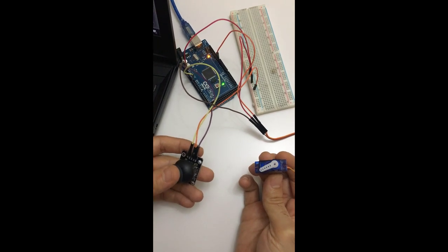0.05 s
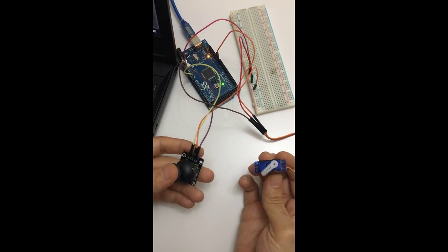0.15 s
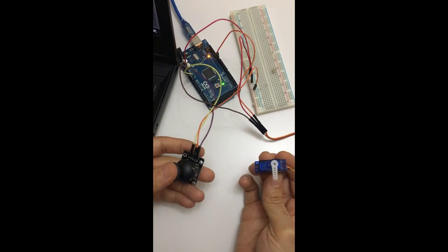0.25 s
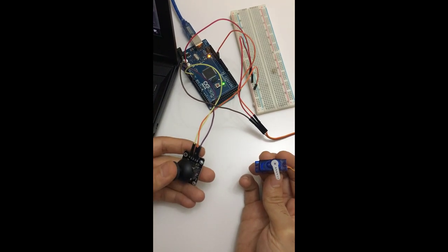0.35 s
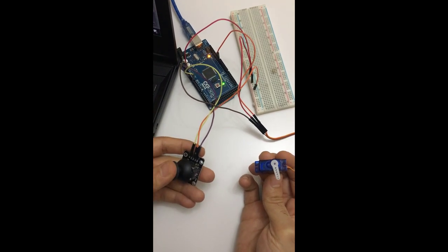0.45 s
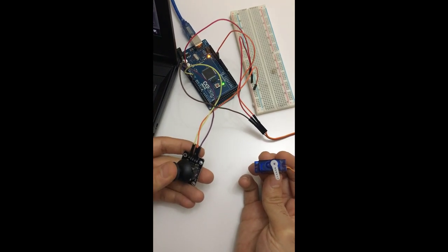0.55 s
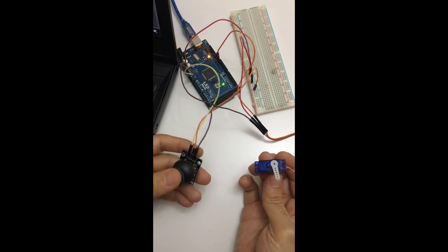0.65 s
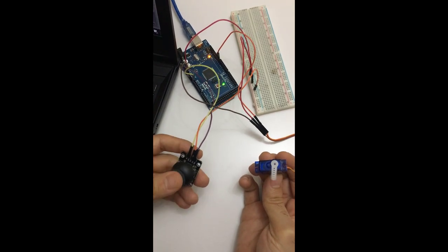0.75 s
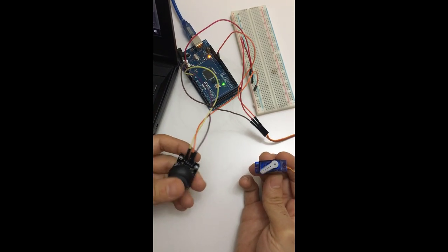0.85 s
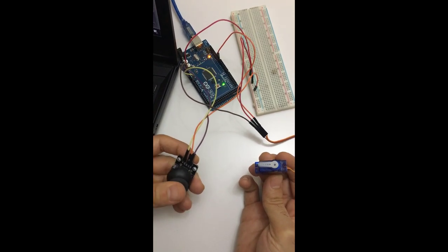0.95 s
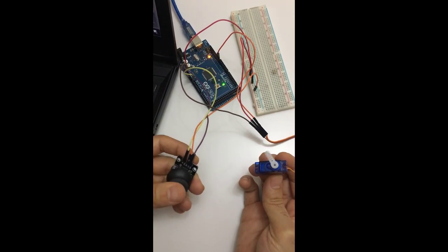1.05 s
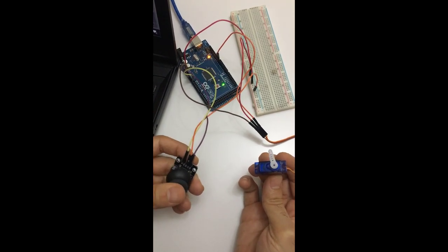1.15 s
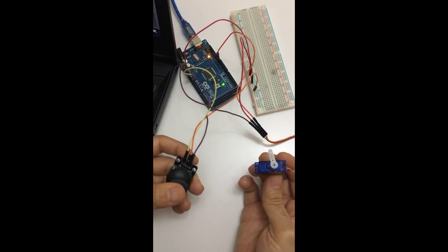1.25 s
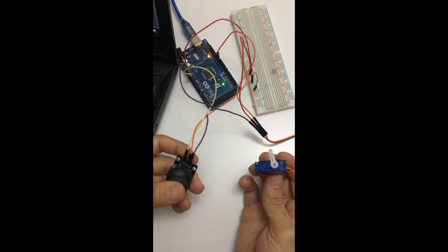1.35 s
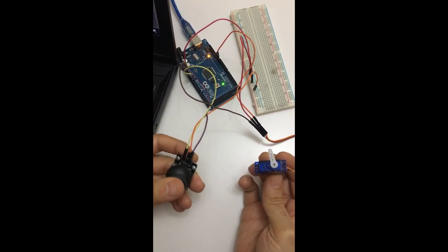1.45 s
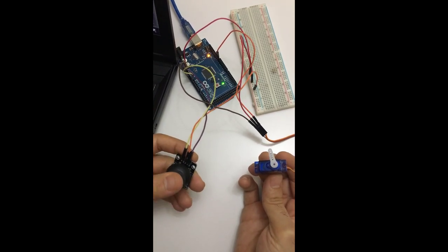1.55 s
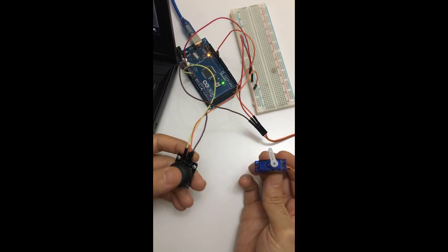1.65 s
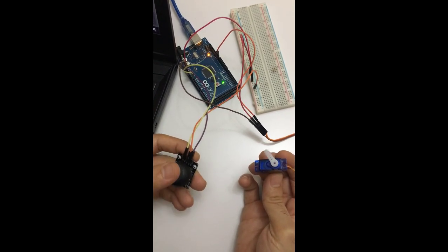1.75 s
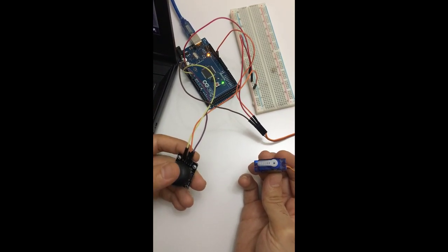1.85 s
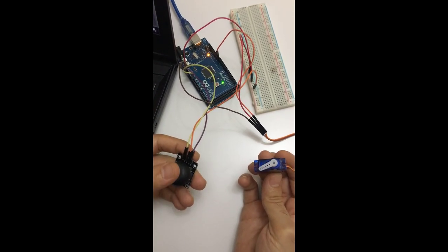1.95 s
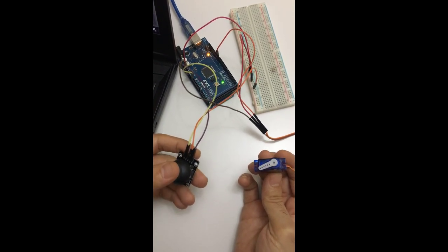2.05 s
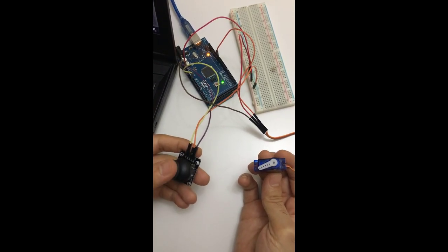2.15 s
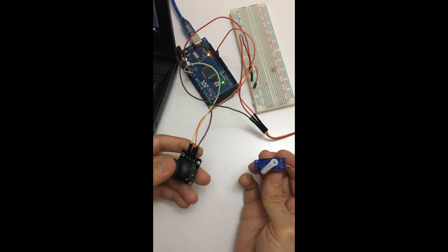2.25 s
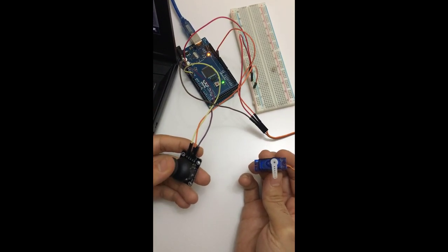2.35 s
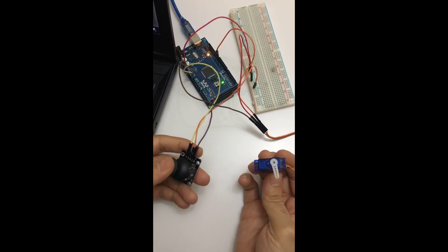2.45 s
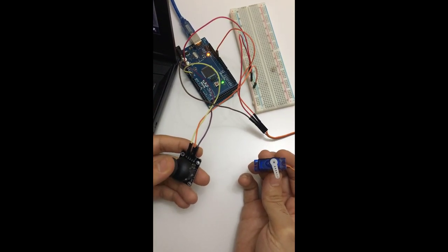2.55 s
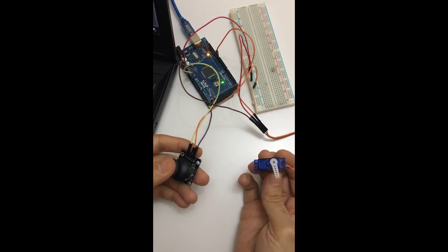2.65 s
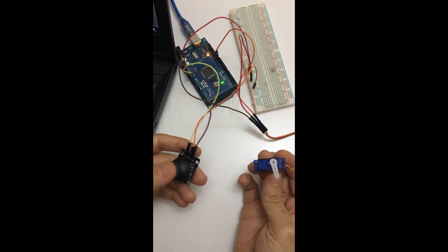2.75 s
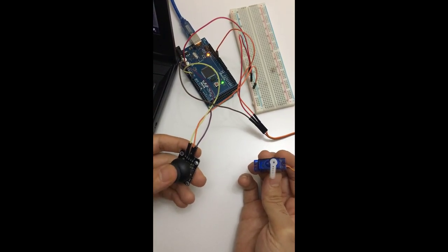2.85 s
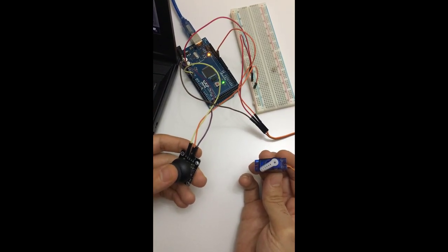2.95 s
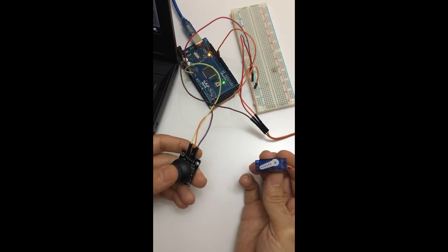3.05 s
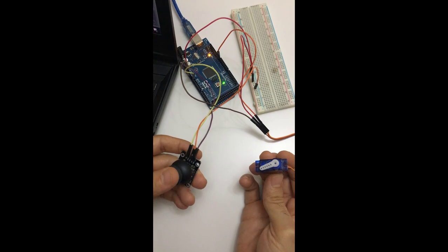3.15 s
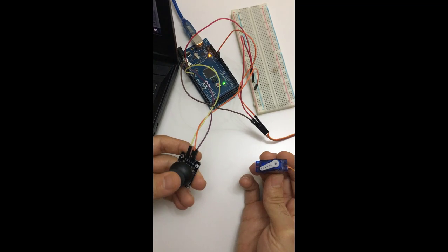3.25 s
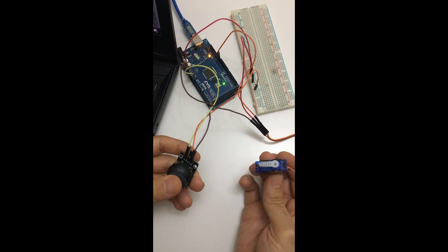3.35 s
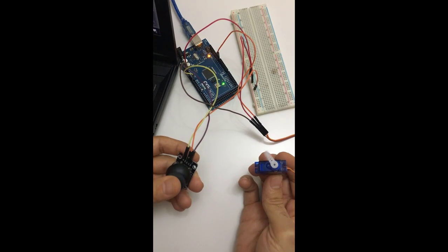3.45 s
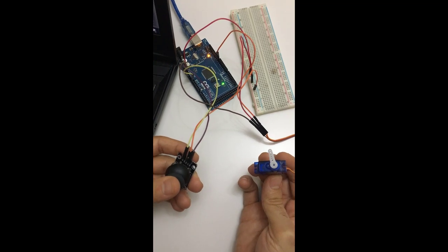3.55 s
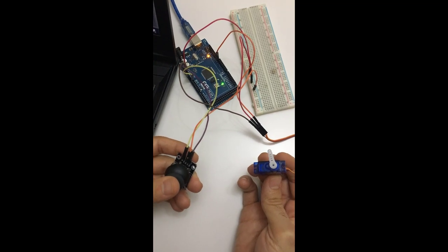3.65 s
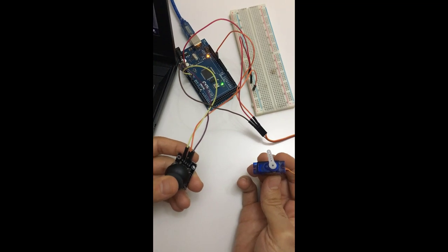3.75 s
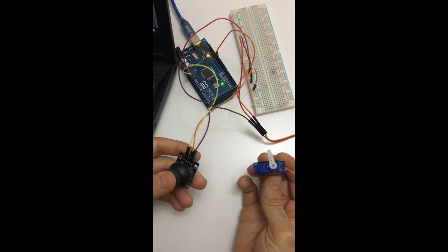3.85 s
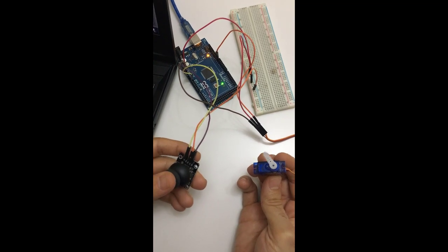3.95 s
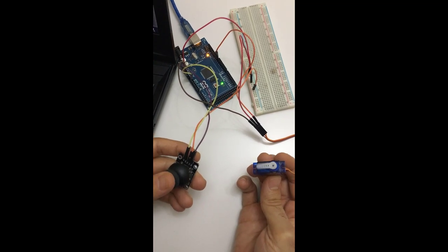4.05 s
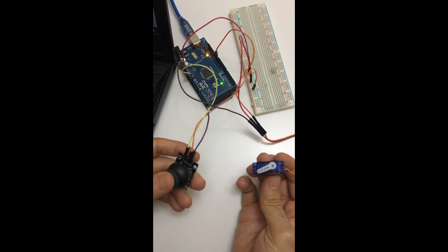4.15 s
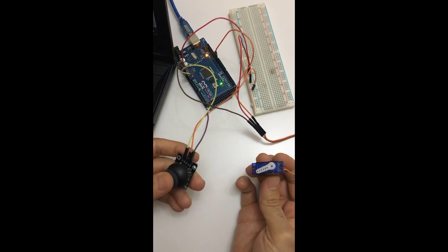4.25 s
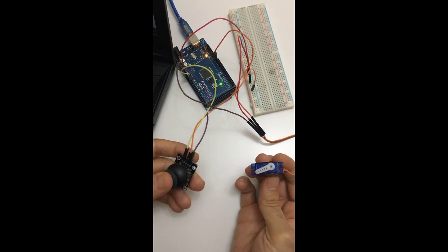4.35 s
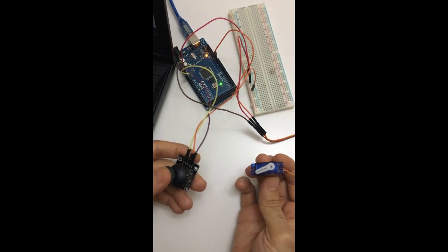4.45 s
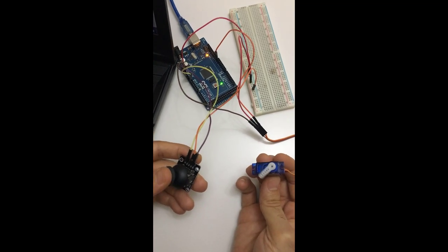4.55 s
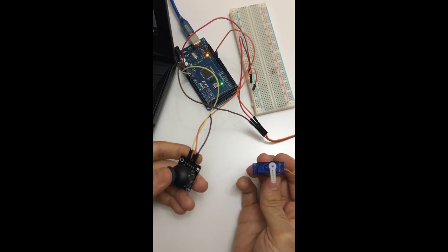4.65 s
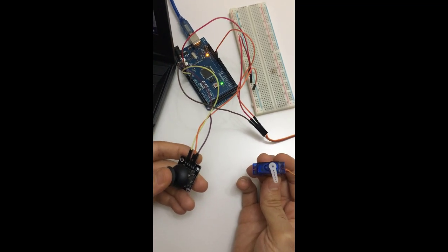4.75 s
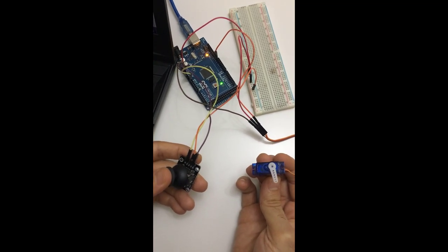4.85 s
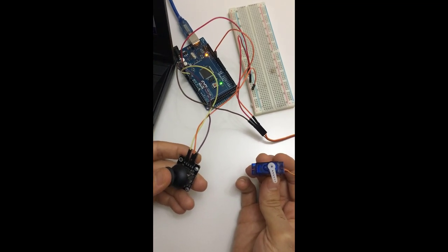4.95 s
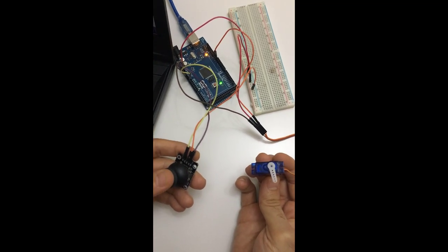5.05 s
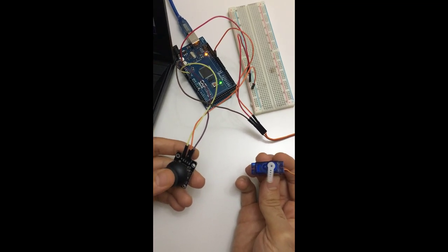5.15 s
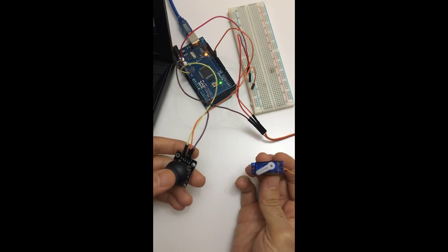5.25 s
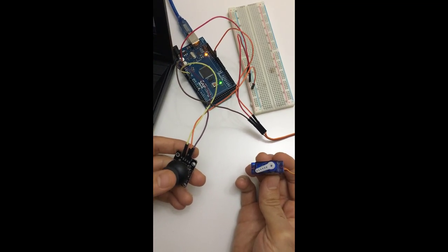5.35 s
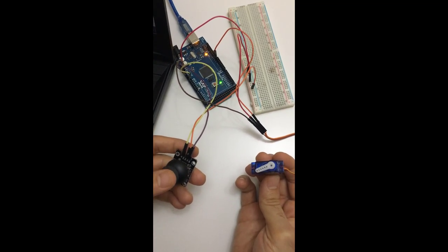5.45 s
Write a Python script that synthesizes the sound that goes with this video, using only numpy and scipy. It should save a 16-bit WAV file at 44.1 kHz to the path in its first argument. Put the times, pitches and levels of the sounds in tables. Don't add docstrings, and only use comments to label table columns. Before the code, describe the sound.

Tiny servo swings back and forth in brief dry buzzing whirrs, gears rattling, with a few thumb-stick clicks over soft room hiss.

```python
import sys
import numpy as np
from scipy import signal
from scipy.io import wavfile
from scipy.ndimage import uniform_filter1d

SR = 44100
rng = np.random.default_rng(int(sys.argv[2]) if len(sys.argv) > 2 else 0)


def boost(x):
    u = np.asarray(x, float) / 20
    return 10 ** u


def generate_wav(sig):
    pcm = np.round(np.clip(np.atleast_2d(sig).T, -1, 1) * 32767).astype(np.int16)
    wavfile.write(sys.argv[1], SR, pcm)


N = 242991
TIME = np.arange(N) / SR

# frequency in Hz, level in dB per Hz.
AIR = [(18, -52), (32, -28), (48, -9), (102, -4.5), (125, -14.5), (158, -9), (296, -16), (500, -21),
       (720, -24), (1730, -28.5), (4000, -32), (14600, -37), (15500, -53), (16300, -56)]
AIR_DB = -67
# frequency in Hz, width in Hz, level in dB, steady part as amplitude.
HUM = [
    (55.4, 12, -77, 0.0039),
    (98.8, 14.3, -73, 0.071),
    (151, 14, -85.5, .01),
    (300.7, 9.1, -83, 0.012),
]
# time in seconds, level of the bass in dB (-72 leaves it unchanged).
RUMBLE = [(0.0, -72), (0.71, -78), (1.04, -65), (1.63, -80.5), (1.96, -71.5), (4.11, -73.5), (5.16, -62.5),
          (5.39, -73), (5.51, -60)]
# centre in seconds, length in seconds, frequency in Hz, level in dB.
MOANS = [(2.5, .14, 205, -67), (4.97, .08, 215, -73), (5.25, .4, 116, -68), (2.15, .17, 250, -73),
         (1.82, .1, 245, -74), (5.3, .35, 235, -77)]

# power on in seconds, standstill aimed at in seconds,
# commutator whine in dB, once-a-turn throb from 0 to 1.
SWINGS = [(-.2, 0.122, -72, 0), (.2, 0.392, -74, 0.3), (0.807, 0.996, -67, 0.4), (0.998, 1.205, -67, 0.56),
          (1.803, 2.016, -70.5, 0.2), (2.307, 2.48, -72, 0.23), (2.897, 3.095, -66.5, 0.44),
          (3.4, 3.62, -65.5, 0.13), (4.004, 4.213, -70.5, 0.3), (4.608, 4.782, -71, 0.25),
          (5.199, 5.399, -66, 0.4)]
TOP_HZ, SPIN_UP_S, BRAKING_S = 442.9, .03, .08
PINION_DB = [-90, -74, -74, -74, -66, -61, -74, -72, -58, -70, -74]
# power on in seconds, braking in seconds, gears still in seconds,
# level at speed in dB, climb under load in dB.
WHIRRS = [(-.2, 0.066, 0.13, -46.5, -13), (0.205, 0.318, .41, -44.5, 2.5), (0.799, 0.957, 1.0, -43.5, 3),
          (1, 1.19, 1.215, -44.5, -2.5), (1.798, 1.961, 2.057, -45, 0), (2.301, 2.419, 2.514, -43.5, 3),
          (2.899, 3.036, 3.105, -42, 3.5), (3.399, 3.595, 3.625, -43, 0), (3.998, 4.167, 4.24, -44, 2),
          (4.6, 4.725, 4.803, -43.5, 2.5), (5.205, 5.341, 5.41, -41.5, 1)]
WAKE_S, WAKE_DB, STILL_DB = 0.044, -11.5, -26.5
TAKE_UP_S, TAKE_UP_DB = 0.005, -13

# frequency in Hz, level in dB per Hz.
CASE = [(880, -35), (1500, -23.5), (2580, -16.5), (4050, -7.5), (4900, -11.5), (6300, -9), (8600, -4),
        (15400, -12.5), (16000, -33), (16500, -55.5)]
# frequency in Hz, width in Hz, lift in dB.
PANELS = [(2360, 425, 7.5), (4300, 100, -1), (4785, 105, -24.5), (6330, 470, 8), (6980, 255, 7),
          (7960, 160, -7.5), (8400, 310, 5), (9160, 450, 4.5), (9770, 710, 6), (10340, 400, -1.5),
          (11990, 250, 7.5), (12740, 250, 4.5)]
THIN_DB = -6

# time in seconds, peak in
# dB, treble over middle in dB, ring of the output gear in dB.
JOLTS = [(0.011, -25, 13, -47), (.0163, -31, 7, -52), (1.1842, -29.5, 14, -48), (1.192, -62, 1.5, -47),
         (1.198, -46, -1, -53), (1.9484, -27, -10, -59), (2.4052, -26, -2, -62), (3.5886, -30, 0, -51),
         (3.591, -31, -1, -46), (3.5995, -30, 14, -49), (3.607, -31, 1, -59), (4.0978, -30, -10, -56),
         (1.053, -28.5, -6, -60), (2.3513, -28.5, 5, -49), (4.012, -36, -3, -48), (4.148, -36, 11, -60),
         (4.658, -26, 1, -63), (4.023, -28, 13.5, -60), (4.6785, -31, 1, -60), (4.6856, -28.5, -3, -65),
         (4.7085, -40, -1, -66), (2.3917, -34, 0, -62), (2.41, -26.5, 1, -66), (2.4248, -31, 0, -65),
         (0.3393, -33, -2, -62), (1.8434, -33, 6, -58), (.8648, -31, 8, -60)]
GEAR_HZ = 5320
# time in seconds, peak in dB, treble over middle in dB.
RATTLES = [(0.057, -27.5, 14), (0.2529, -30, 0), (0.3097, -33, 13), (0.3294, -28, 15), (0.0248, -34, 15),
           (0.8464, -32, 8), (1.193, -30.5, 17), (1.8173, -30, -12), (1.8519, -31, -13), (1.8865, -29.5, 1),
           (1.8912, -32, 8), (1.9171, -29.5, -7), (1.959, -27, -2), (1.9639, -31, 13), (2.3259, -34, 16),
           (2.3795, -23.5, 13), (2.4175, -27.5, 3), (3.0404, -34, 9), (3.0573, -33, 9.5),
           (4.0176, -33, -12), (4.0765, -26.5, 10), (4.0843, -32, 0), (4.1182, -29, -1), (4.1276, -24, 17),
           (4.1433, -30, -3), (4.1503, -26, 8), (4.1703, -30, -11), (4.6324, -29, 15), (4.7254, -36, 12),
           (4.7451, -30.5, 15)]
SLACK_PER_S = [8, 12, 4, 3, 12, 15, 5, 10, 8, 15, 6]
SLACK_DB, SLACK_SPREAD_DB, SLACK_TILT_DB = 10, 3, 1

# time in seconds, peak in dB, treble over middle in dB.
TICKS = [(0.1219, -53, 3), (0.2019, -57, -5), (0.4443, -56.5, -2), (0.5417, -57.5, 1), (1.3198, -61, -19),
         (1.3793, -57, -8), (1.4394, -67, -15), (1.4692, -37, 25), (1.4782, -62, 17), (1.4858, -57, -1),
         (1.5029, -61, -2), (1.801, -53, -5), (2.0409, -58, 8), (2.1412, -59, -19), (2.2057, -60.5, -4),
         (2.2203, -56.5, -11), (2.26, -54, 15.5), (2.5089, -57, -1), (2.5321, -58, 3), (2.5617, -52, 4),
         (2.6215, -61, -1), (3.1211, -57, -3), (3.779, -56, -7), (3.8615, -37, 16), (3.8705, -61, 7),
         (3.8978, -43.5, -11), (4.001, -60, 0), (4.3415, -52, -8), (4.8409, -55.5, -5), (5.2005, -54, 2)]
# first pulse in seconds, last pulse in seconds, level in dB.
HUNTS = [(.14, .18, -65), (.42, .44, -65), (.483, .483, -63), (.52, .52, -65), (1.28, 1.3, -62),
         (1.36, 1.36, -68), (1.42, 1.46, -63), (2.06, 2.12, -69), (2.3, 2.3, -63), (2.6, 2.6, -63),
         (3.14, 3.18, -66), (3.22, 3.26, -62), (3.68, 3.72, -61), (3.76, 3.76, -63), (3.82, 3.84, -60),
         (4.28, 4.32, -64), (4.8, 4.8, -56), (4.82, 4.82, -64), (4.88, 4.94, -63), (5.42, 5.46, -65),
         (5.5, 5.5, -61)]
HUNT_DB, HUNT_SPREAD_DB, HUNT_TILT_DB = 0.9, 1, -20
PULSE_S, SETTLE_S = .02, .23
SEAT_HZ, SEAT_DB, SEAT_LIFT_DB = 4180, -52, 7

# time in seconds, level in dB, low ring in Hz, high ring in Hz, high over low in dB.
SNAPS = [(0.2504, -37.5, 2380, 3500, -5), (0.9709, -36.5, 2180, 3900, 4), (1.469, -38.5, 5060, 7400, 6),
         (2.285, -57, 2670, 5290, 9.5), (3.8612, -36.5, 5150, 7540, 1.5), (3.8974, -40.5, 2040, 4940, 3),
         (4.576, -62.5, 2580, 7200, 15)]
# frequency in Hz, t60 in seconds.
WALLS = [(1000, 0.37), (4000, 0.27), (9000, 0.17), (15000, 0.19)]


def evened(x):
    return x / np.sqrt(np.mean(x ** 2) + 1e-20)


def read(points, hz):
    f, value = np.transpose(points)
    return np.interp(np.log(hz + 1), np.log(f + 1), value)


def resonate(x, hz, width):
    turn = np.exp(2j * np.pi * np.cumsum(hz * np.ones(len(x))) / SR)
    r = np.exp(-np.pi * width / SR)
    return 2 * (turn * signal.lfilter([(1 - r) ** 2], [1, -2 * r, r * r], x / turn)).real


def burst(times, dbs, decay_s):
    out, t = np.zeros(N + 400), np.arange(400) / SR
    shape = (1 - np.exp(-t / 0.000073)) * np.exp(-t / decay_s)
    for s, db, chatter in zip(times, dbs, rng.standard_normal((len(times), 400))):
        out[round(s * SR):][:400] += boost(db) * chatter * shape
    return out[:N]


def room_tone():
    frames, hz = N // 512 + 5, np.fft.rfftfreq(2048, 1 / SR)
    a, b = rng.standard_normal((frames, len(hz), 2)).T
    spectrum = (a + 1j * b) * boost(read(AIR, hz))[:, None]
    hiss = evened(signal.istft(spectrum, nperseg=2048, noverlap=1536)[1][:N])
    swell = boost(np.interp(TIME, *np.transpose(RUMBLE)) + 72.0)
    hum = np.zeros(N)
    for f, width, db, steady in HUM:
        source = rng.standard_normal(N) + steady * np.sin(2 * np.pi * f * TIME)
        line = boost(db) * evened(resonate(source, f, width))
        hum += line * (swell if f < 80 else 1)
    drones = np.zeros(N)
    for s, length, f, db in MOANS:
        drones += boost(db) * np.exp(-((TIME - s) / length * 2) ** 2) * np.sin(2 * np.pi * f * TIME)
    return boost(AIR_DB - 3.5) * hiss + hum + drones


def case(x, tilt_db=0, mount_db=0, low_db=0):
    hz = abs(np.fft.fftfreq(4096, 1 / SR))
    db = read(CASE, hz)
    db += sum(lift / (1 + (2 * (hz - f) / w) ** 2) for f, w, lift in PANELS)
    db += tilt_db * np.tanh((hz - 7500) / 1500) / 2
    db += mount_db / (1 + ((hz - 4170) / 300) ** 2)
    db += low_db / (1 + (hz / 5000) ** 8)
    log_gain = np.log(boost(np.maximum(db, -80)))
    taps = np.fft.ifft(np.exp(np.conj(signal.hilbert(log_gain)))).real[:1024]
    return signal.oaconvolve(x, taps / np.linalg.norm(taps))[:N]


def shaft():
    drive = sum((TIME > on) * np.clip((stop - TIME) / BRAKING_S, 0, 1) for on, stop, *_ in SWINGS)
    lag = np.exp(-1 / (SPIN_UP_S * SR))
    return TOP_HZ * signal.lfilter([1 - lag], [1, -lag], drive, zi=[lag])[0]


def whirr_db():
    out = np.full(N, -140.)
    for on, brake, still, db, climb_db in WHIRRS:
        inside = (TIME >= on) & (TIME < still)
        t = TIME[inside]
        shape = np.interp(t, [on, brake], [-climb_db, 0])
        shape += STILL_DB * np.clip((t - brake) / (still - brake), 0, 1) ** 1.2
        shape += WAKE_DB * np.exp(-(t - on) / WAKE_S)
        shape += TAKE_UP_DB * np.exp(-(t - on) / TAKE_UP_S)
        out[inside] = np.maximum(out[inside], db + shape)
    return out


def motor():
    speed = shaft()
    turns = np.cumsum(speed) / SR
    swing = np.searchsorted([row[0] for row in SWINGS], TIME) - 1
    whine_db, throb = np.array(SWINGS)[swing, 2:].T

    each_turn = boost(1.2 * rng.standard_normal(N)[turns.astype(int)])
    high_spot = np.exp(np.cos(2 * np.pi * turns)) / 1.27 * each_turn
    throb = np.clip(throb, 0, 1)
    wander = boost(1.47 * evened(uniform_filter1d(rng.standard_normal(N), 150)))
    rubbing = (1 - throb + throb * high_spot) * wander * rng.standard_normal(N)
    scrape = case(evened(rubbing) * boost(whirr_db()))
    body = signal.sosfilt(signal.butter(2, 3300, fs=SR, output='sos'), scrape)
    scrape -= body * np.clip(1 - (speed / 400) ** 2, 0, 1) * .9

    whine = boost(whine_db) * (speed / TOP_HZ) ** 5.3
    whine *= boost(1.2 * evened(uniform_filter1d(rng.standard_normal(N), 700)))
    bars = np.sin(6 * np.pi * turns) + boost(-12) * np.sin(12 * np.pi * turns)

    fuzz = evened(resonate(rng.standard_normal(N), 9 * speed, 40))
    pinion = (np.sin(18 * np.pi * turns) + .5 * fuzz) * boost(PINION_DB)[swing]
    pushing = np.clip(np.gradient(speed) * SR / 1500, 0, 1) * (speed / TOP_HZ) ** 2
    return scrape + whine * np.sqrt(2) * bars + pushing * pinion


def knocks(rows, decay_s, mount_db):
    dull, bright, t = np.zeros(N + 400), np.zeros(N + 400), np.arange(400) / SR
    shape = (1 - np.exp(-t / 0.00038)) * np.exp(-t / decay_s)
    for (s, db, tilt_db), chatter in zip(rows, rng.standard_normal((len(rows), 400))):
        share = np.clip(.5 + (tilt_db - 2.0) / 22, 0, 1)
        at = round(s * SR)
        blow = boost(db) * np.sqrt(np.mean(shape ** 2)) * evened(chatter * shape)
        dull[at:at + 400] += np.sqrt(1 - share) * blow
        bright[at:at + 400] += np.sqrt(share) * blow
    return case(dull, -8, mount_db, THIN_DB) + case(bright, 7, 0, THIN_DB)


def jolts():
    s, _, _, ring_db = np.transpose(JOLTS)
    ring = resonate(burst(s, ring_db + 20, 0.0014), GEAR_HZ, 750)
    return knocks([row[:3] for row in JOLTS], 0.001, 0) + ring


def slack():
    slot_s = .004
    slots = np.arange(0, TIME[-1] - .02, slot_s)
    swing = np.searchsorted([row[0] for row in WHIRRS], slots) - 1
    luck = rng.random(len(slots))
    size, colour = rng.standard_normal((2, len(slots)))
    db = np.interp(slots, TIME, whirr_db())
    hit = (luck < np.array(SLACK_PER_S)[swing] * slot_s) & (db > -70)
    return np.transpose([slots, db + SLACK_DB + SLACK_SPREAD_DB * size, SLACK_TILT_DB * colour])[hit]


def rattle():
    return boost(1.5) * knocks([*RATTLES, *slack()], 0.0013, 0)


def hunting():
    pulses = []
    for first, last, db in HUNTS:
        pulses += [(s, db) for s in np.arange(first, last + PULSE_S / 2, PULSE_S)]
    s, db = np.transpose(pulses)
    late, size, colour = rng.standard_normal((len(s), 3)).T
    return np.transpose([s + 0.0012 * late, db + HUNT_DB + HUNT_SPREAD_DB * size, HUNT_TILT_DB + 4 * colour])


def ticking():
    return boost(4.0) * knocks([*TICKS, *hunting()], 0.0012, SEAT_LIFT_DB)


def settling():
    grid = np.arange(PULSE_S, TIME[-1] - PULSE_S, PULSE_S)
    since = np.array([grid - row[1] for row in SWINGS])
    since = np.where(since > 0, since, 9).min(0)
    strength_db = SEAT_DB - 40 * since + 3 * rng.standard_normal(len(grid))
    near = since < SETTLE_S
    return resonate(burst(grid[near], strength_db[near], .002), SEAT_HZ, 350)


def stick():
    out = np.zeros(N)
    for s, db, low_hz, high_hz, high_db in SNAPS:
        part = burst([0], [db + 3], 0.0021)[:900]
        part[4] += boost(db + 26.5)
        low = resonate(resonate(part, low_hz, 1200), low_hz, 1200)
        high = resonate(resonate(part, high_hz, 2400), high_hz, 2400)
        out[round(s * SR):][:900] += low + boost(high_db - 6) * high
    return out


def walls(x):
    taps, starts = np.zeros(SR // 2), np.arange(390, SR // 2 - 20, 20)
    taps[starts + rng.integers(0, 20, len(starts))] = rng.choice([-1., 1.], len(starts))
    taps[starts[0]] = 4.
    hz, t, z = signal.stft(taps, SR, nperseg=128)
    tail = signal.istft(z * boost(-60 * t / read(WALLS, hz)[:, None]), SR, nperseg=128)[1]
    return signal.fftconvolve(x, tail / np.linalg.norm(tail))[:N]


def scene():
    servo = motor() + jolts() + rattle() + ticking() + settling()
    snaps = stick()
    echo = boost(-13) * walls(servo + boost(-7) * snaps)
    return (room_tone() + servo + snaps + echo)[None]


def low_pass(x):
    return signal.sosfilt(signal.butter(12, 16650, fs=SR, output="sos"), x)


def record(dry):
    return low_pass(dry)


dry = scene()
out = record(dry)
generate_wav(out)
```